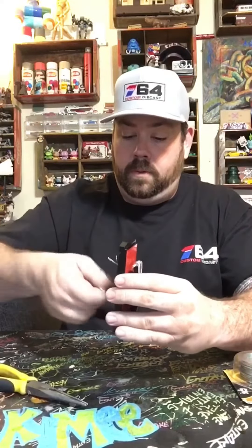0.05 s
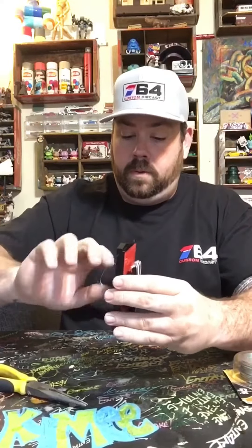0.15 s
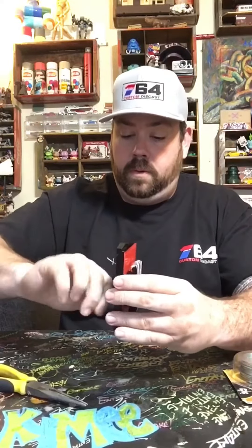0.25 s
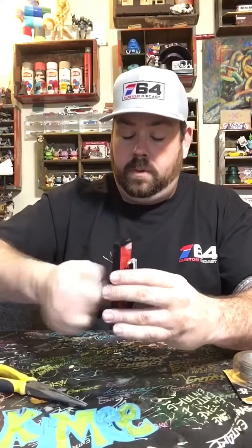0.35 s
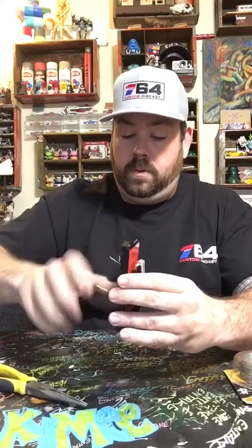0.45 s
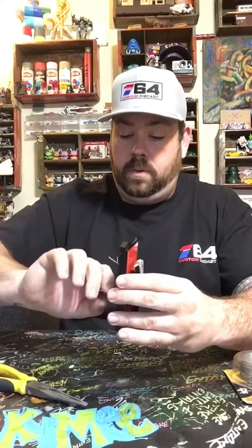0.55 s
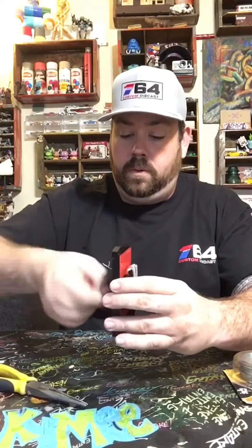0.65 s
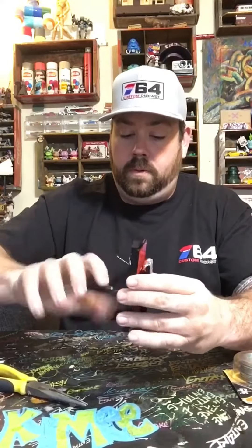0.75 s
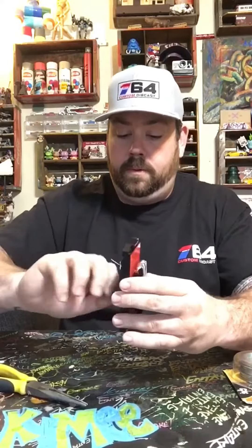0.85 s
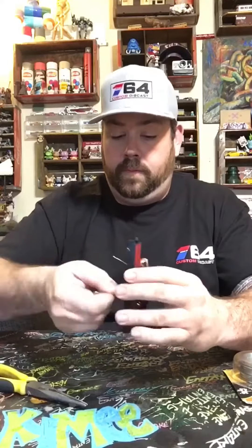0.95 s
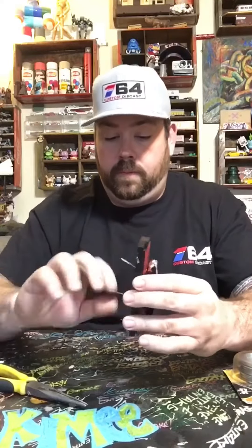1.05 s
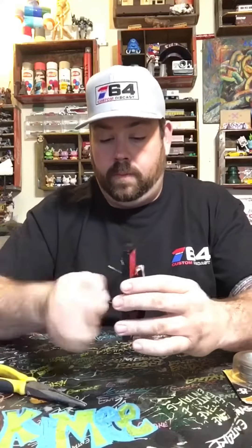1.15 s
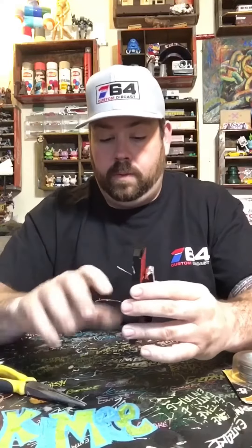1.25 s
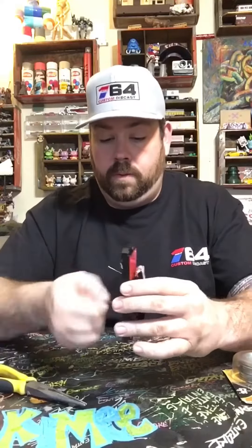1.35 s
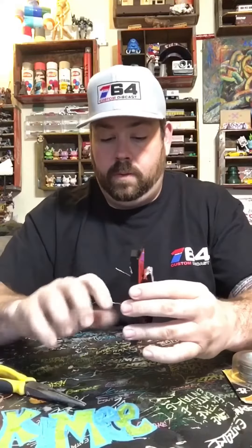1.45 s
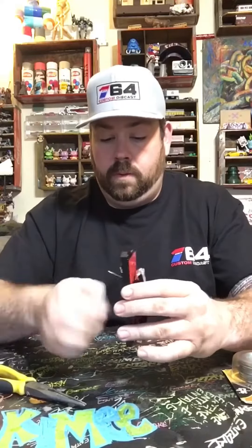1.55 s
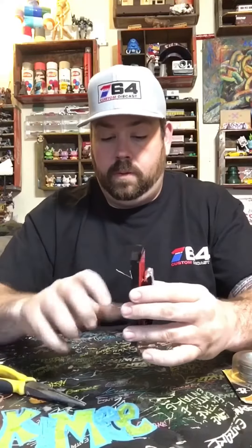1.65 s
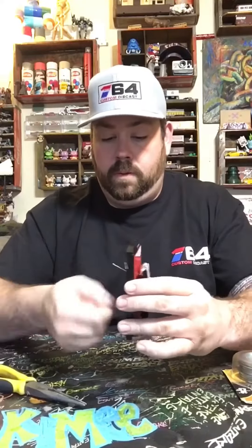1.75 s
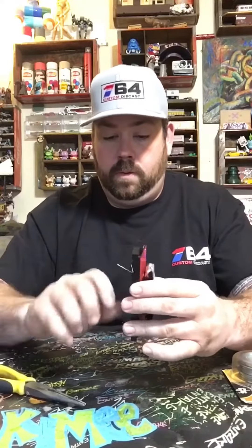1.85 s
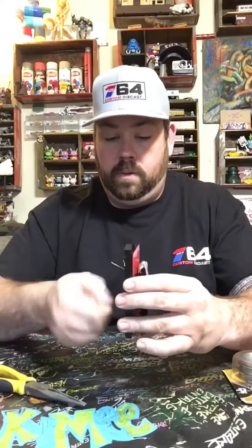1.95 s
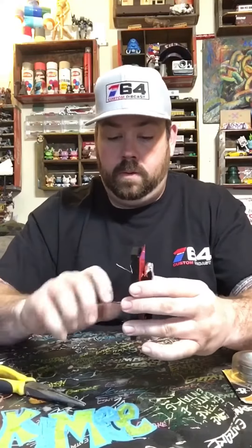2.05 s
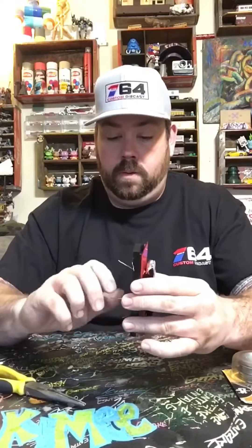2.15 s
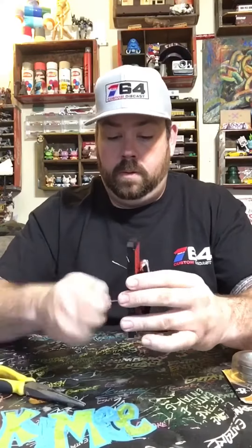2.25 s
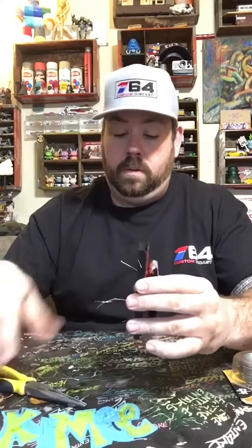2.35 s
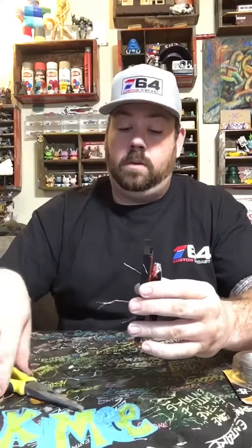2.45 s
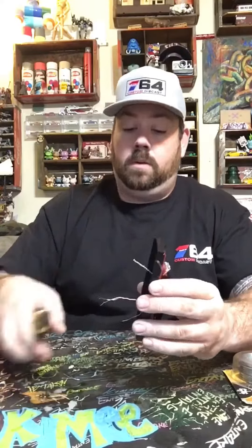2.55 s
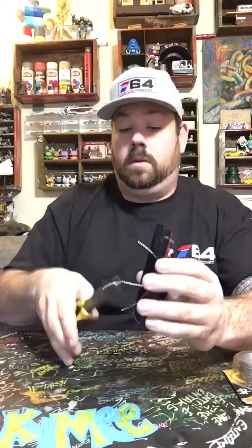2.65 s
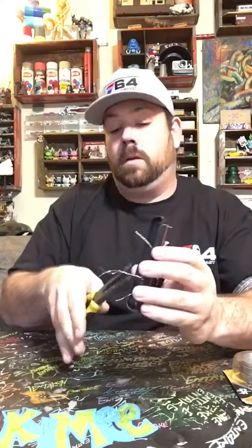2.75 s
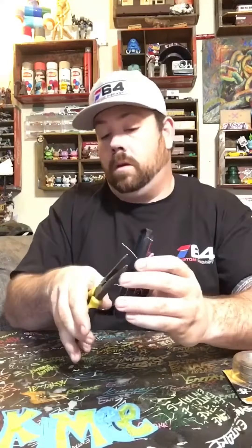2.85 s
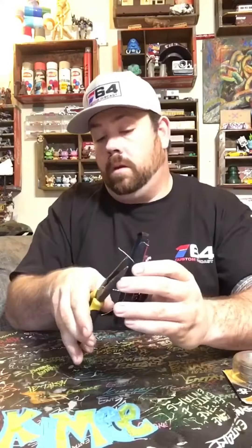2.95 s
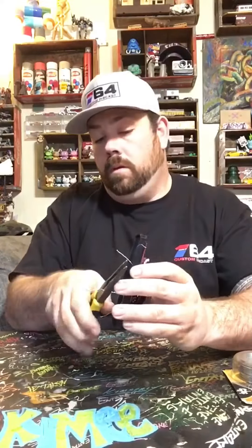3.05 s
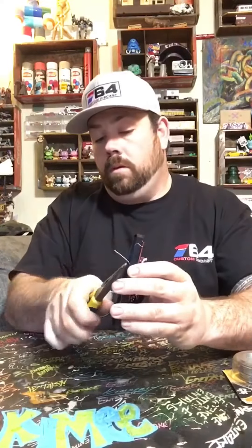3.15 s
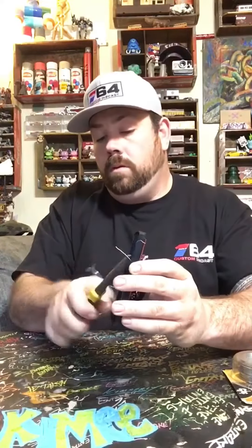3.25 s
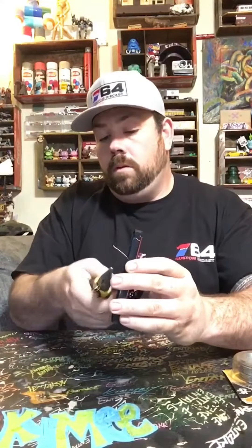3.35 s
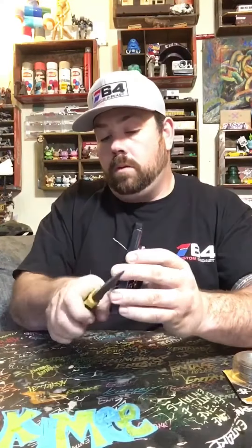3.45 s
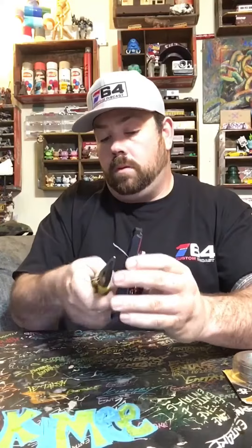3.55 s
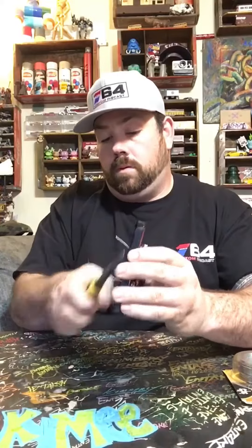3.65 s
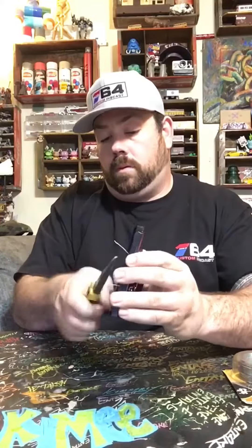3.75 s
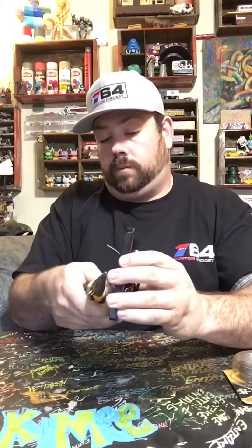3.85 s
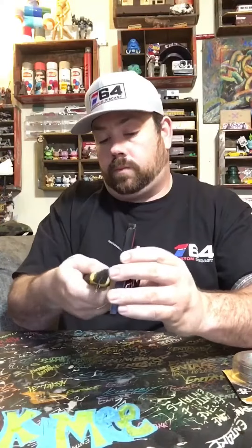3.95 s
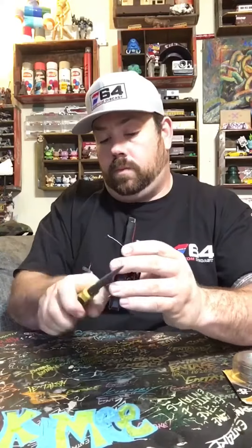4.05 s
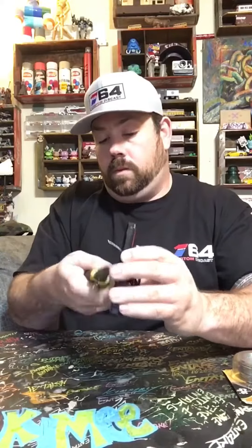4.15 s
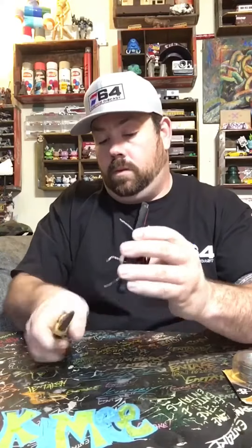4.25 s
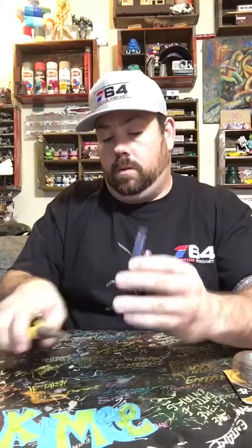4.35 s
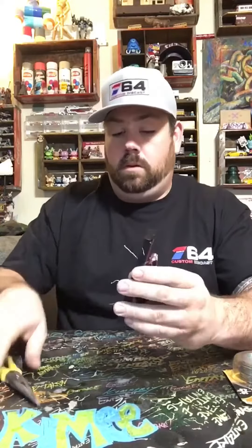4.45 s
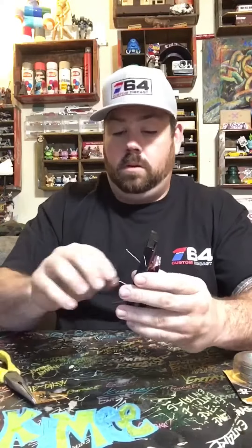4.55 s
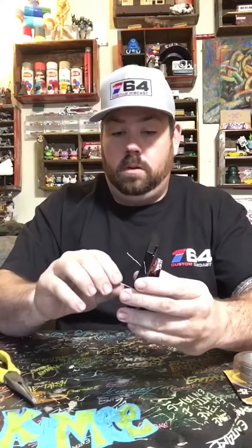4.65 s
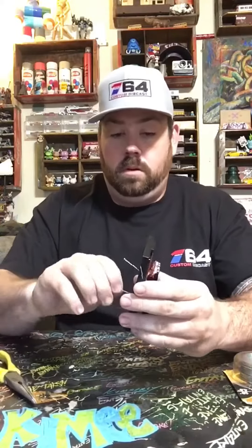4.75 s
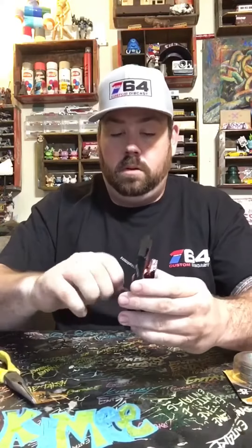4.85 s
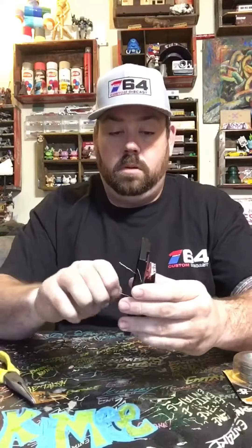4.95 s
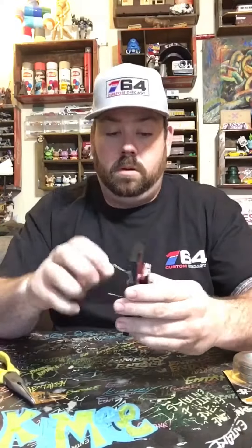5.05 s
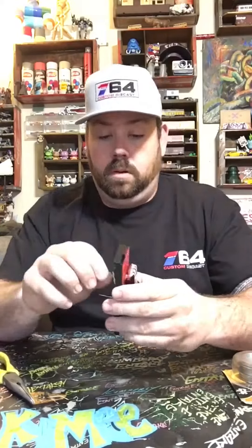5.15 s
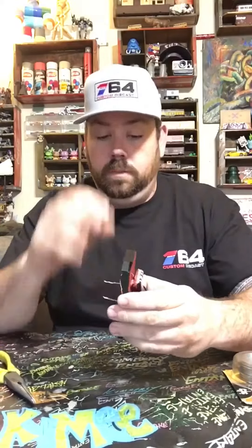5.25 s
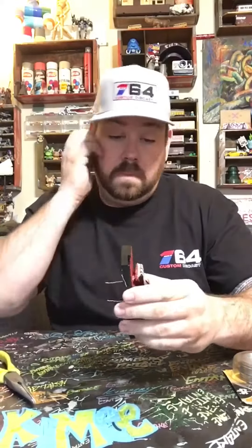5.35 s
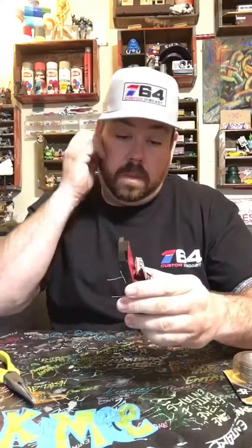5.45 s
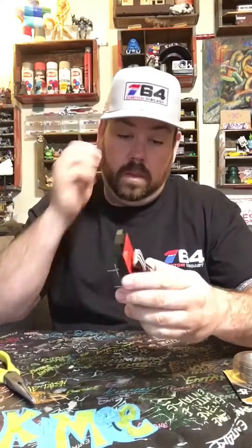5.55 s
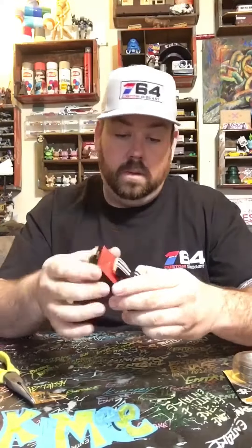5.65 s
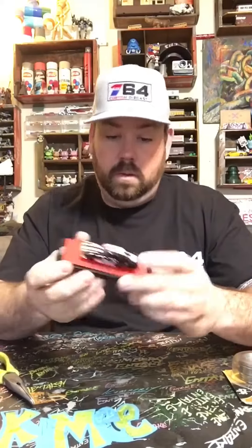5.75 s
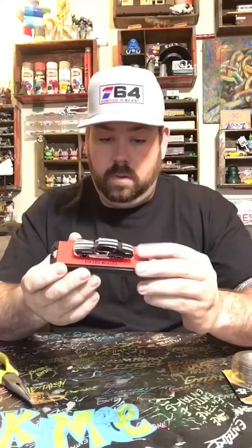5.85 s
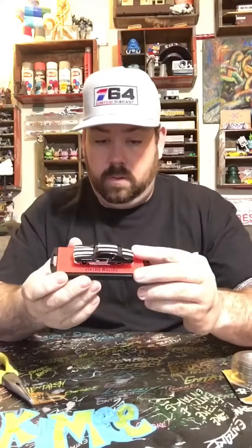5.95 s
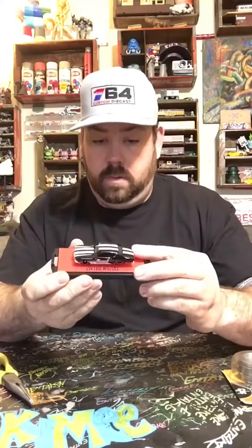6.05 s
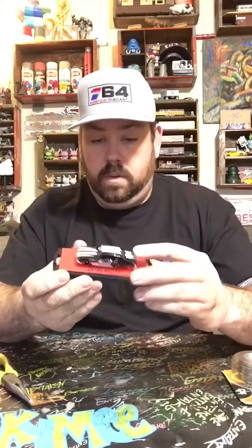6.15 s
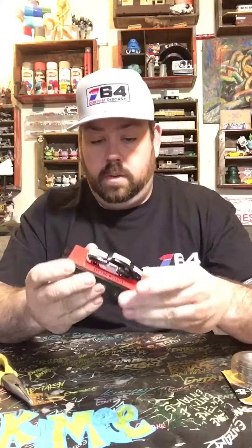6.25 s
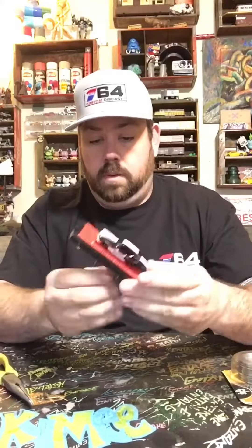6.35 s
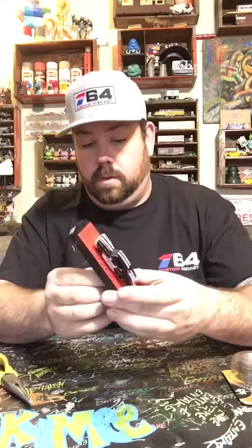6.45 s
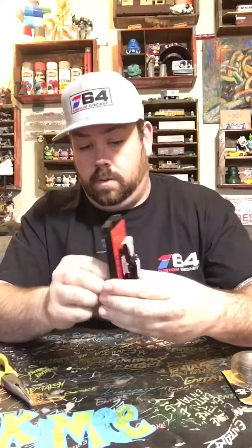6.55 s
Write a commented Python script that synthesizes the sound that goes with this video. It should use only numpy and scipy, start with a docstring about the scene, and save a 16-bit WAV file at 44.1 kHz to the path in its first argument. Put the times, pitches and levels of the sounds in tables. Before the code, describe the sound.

Sparse tiny metallic ticks and grainy finger strokes come first, broken by a crisp wire snap. A tool is lifted from a wooden table with a short knock and scrape, and light clicks and tiny squeaks follow in clusters. The tool then lands hard, rattling in rapid bounces, the loudest event. Handling ticks return quietly. Close microphone, small room with short tail, low appliance hum and soft hiss.

```python
"""Close by, thin steel wire ticks and snaps as fingers and pliers twist it on a small plastic base.
Fingers rub over it in grainy strokes, metal squeaks, and pliers bounce and drag on a wooden table.
Ticks, taps and friction are noise through resonances; the blows ring the decaying modes of table and pliers.
A short room tail follows. Behind lie faint hoots, an appliance's beating hum and whines, and steady air noise."""
import sys
import numpy as np
from scipy import signal
from scipy.fft import rfft, irfft, next_fast_len
from scipy.io import wavfile

SR = 44100
rng = np.random.default_rng(int(sys.argv[2]) if len(sys.argv) > 2 else 0)


def materialize(psi):
    """Save the field psi as 16-bit PCM at rate SR to the path in sys.argv[1].

    A 1-D psi becomes a single channel; in a 2-D psi each row is a channel.
    """
    bounded = np.clip(np.atleast_2d(psi).T, -1, 1)
    quanta = np.round(bounded * 32767).astype(np.int16)
    wavfile.write(sys.argv[1], SR, quanta)


N = 290486

# bounces of the pliers on the table: (time [s], level [dB], hardness of the contact [0-1],
# boom of the lowest modes [dB], clank of the jaws [dB])
BOUNCES = [(2.4683, -26, 0.63, -1.5, -15.5), (2.4715, -27.5, 0.07, -8, -9), (2.484, -34, 0, -0.5, -10),
           (2.502, -46, 0, -9, -11), (2.628, -41, 0, -8, -6), (2.638, -38.5, 0, -2, -12),
           (2.645, -50, 0, -10, -6), (2.658, -50, 0, -11, -11), (4.3933, -15.5, 0.7, 0, -3.5),
           (4.4107, -14.5, 0.64, -5, -0.5), (4.4115, -16, 0.6, 3, 3), (4.43, -21, 0.47, -2, 1),
           (4.4385, -29, 0.45, -6, -7.5), (4.4564, -25.5, 0.63, 3.5, -5), (4.473, -29, 0.46, 6, 3),
           (4.482, -35.5, 0.25, 3, -3), (4.4971, -32.5, 0.43, 3.5, 3.5), (4.509, -37, 0.04, 4, 3),
           (4.5227, -38.5, 0.25, 5, 6), (4.538, -47, 0.1, 2, 2)]
FAINT_COUNT = 10   # faint ticks, and as many faint rubs


def from_db(db):
    """Amplitude factor of a level in dB."""
    return 10 ** (np.asarray(db) / 20)


def rms_one(x):
    """Scales a signal to rms 1."""
    return x / np.sqrt(np.mean(x ** 2) + 1e-20)


def add(track, s, piece):
    """Mixes a piece in at a time in seconds."""
    at = max(round(s * SR), 0)
    track[at:at + len(piece)] += piece[:N - at]


def resonance(x, hz, width_hz):
    """Two-pole band-pass, gain about 1 on top."""
    r = np.exp(-np.pi * width_hz / SR)
    poles = [1, -2 * r * np.cos(2 * np.pi * hz / SR), r * r]
    return signal.lfilter([(1 - r * r) / 2, 0, (r * r - 1) / 2], poles, x)


def twice(x, hz, width_hz):
    """Two resonances in a row, the second twice as wide, scaled to rms 1."""
    return rms_one(resonance(resonance(x, hz, width_hz), hz, 2 * width_hz))


def filtered(x, order, hz, kind="low"):
    """Butterworth low-pass or high-pass."""
    return signal.sosfilt(signal.butter(order, hz, kind, fs=SR, output="sos"), x)


def dying(t60, size):
    """Envelope that loses 60 dB in t60 seconds, 4 ms at the shortest."""
    return from_db(-60 * np.arange(size) / SR / max(t60, .004))


def swelling(rise_s, size):
    """Envelope that rises exponentially towards 1."""
    return 1 - np.exp(-np.arange(size) / SR / rise_s)


def wander(per_s):
    """Random drift: straight lines between normal draws, two draws per cycle."""
    knots = rng.standard_normal(200)
    return np.interp(np.arange(N) / SR * per_s * 2, np.arange(200), knots)


def at_random(row):
    """Copies of a row at random times."""
    return [(s, *row) for s in rng.uniform(0, N / SR, FAINT_COUNT)]


def glide(from_hz, to_hz, size):
    """Phase of a tone whose pitch moves in a straight line."""
    return 2 * np.pi * np.cumsum(np.linspace(from_hz, to_hz, size)) / SR


def friction_grains(size, grain_db):
    """Noise with occasional far stronger samples, like surfaces catching on each other."""
    return rng.standard_normal(size) * from_db(grain_db * np.minimum(rng.exponential(1, size), 5))


def wire():
    """Each tick is a double snap and a dying burst through ring, frame, free ends, glint and the base's knock."""
    # wire ticks: (time [s], level [dB], ring [Hz], glint above the ring [dB], knock of the base [dB])
    tick_table = [(.18, -60.5, 6300, 0, -18), (.346, -63, 6540, 3.5, -20), (.4738, -66, 5530, -1, -13),
                  (.514, -53, 4500, -6, -24), (.5615, -38, 4880, -3.5, -36), (.7392, -64, 5530, 18, -24),
                  (.9843, -55, 6600, 2, -13), (1.3344, -25.5, 5900, -12, -0.5), (1.917, -66, 5000, 5, -13),
                  (2.1169, -52.5, 6060, -16, -21), (2.3105, -47, 7300, -6, -7.5),
                  (2.376, -62, 3337, 12, -14), (2.6085, -51, 2380, -16, 2), (2.6621, -53, 6440, -9, -6),
                  (2.6818, -52.5, 4570, -9, -18), (2.7809, -53.5, 4730, -23, -30),
                  (2.834, -54, 6220, -3, -21), (2.8465, -48, 3380, -2, 0.5), (2.911, -43, 5300, 3, -27),
                  (2.9694, -64, 2120, -32, 13), (3.098, -52, 1940, -18, -14), (3.088, -60, 6000, -6, -20),
                  (3.132, -43, 6600, -17, -30), (3.145, -69, 4000, -7, -2), (3.5344, -51, 5500, 1.5, -2),
                  (3.6167, -61.5, 7400, -5, 7.5), (3.652, -60, 5500, 5, -15), (3.787, -59, 6900, -17, -20),
                  (3.6846, -51, 6300, -5, -19), (3.699, -49.5, 3530, -25, -4),
                  (3.8232, -56, 7100, -24, -13), (3.8563, -44.5, 6700, 1.5, -38),
                  (3.8755, -56, 5430, -1, -21), (3.889, -43.5, 6740, 3, -30),
                  (3.9746, -58.5, 5630, 6.5, -26), (4.01, -55, 5500, 1, -25), (4.0227, -47, 3650, -6, -29),
                  (4.032, -38.5, 5660, -4, -15), (4.0395, -34.5, 5040, 0, -26), (4.082, -73, 6000, 0, -25),
                  (4.208, -28, 5340, 1.2, -35), (4.9746, -58.5, 3300, -3, -17),
                  (5.019, -52.5, 7080, 6, -30.5), (5.2592, -47, 4060, -27, 2.5),
                  (5.3986, -59, 4680, -19, -14), (5.5368, -43, 4100, -5, -20.5),
                  (5.5415, -47.5, 6000, -7, -17), (5.606, -40, 3030, -12, -25),
                  (5.6075, -42.5, 7100, -5, -25), (5.611, -43.5, 3940, -9, -18), (5.648, -70, 7100, 8, -25),
                  (5.652, -67, 7100, 10, -25), (5.674, -56, 2900, -11, -19), (5.7097, -46.5, 2590, -17, -4),
                  (5.7225, -55.5, 6430, 0.5, -16), (5.731, -55.5, 6020, -25, -12),
                  (5.8845, -54, 1995, -12, 0), (6.062, -60, 2890, -2, -27), (6.072, -65, 2880, 9, -29),
                  (6.0915, -52.5, 3260, -14, -4), (6.1355, -60.5, 3480, 10.5, -22),
                  (6.1848, -51.5, 3330, -11, -4), (6.264, -61, 5100, 2.5, -3),
                  (6.269, -65, 4940, 17.5, -11), (6.4292, -51.5, 6350, -3, -9.5),
                  (6.4592, -59, 3900, -22, 16), (6.535, -32.5, 3630, -29, -4), (6.58, -52.5, 7800, 3.5, -2)]
    # clicks around the landing of the pliers, a faint one just before it, then their loose joint
    # between the bounces: (time [s], level [dB])
    pliers_clicks = [(4.3845, -43), (4.4385, -35), (4.484, -44), (4.488, -33), (4.493, -51), (4.5022, -52),
                     (4.5125, -52), (4.518, -40), (4.527, -51), (4.533, -50), (4.543, -56), (4.5478, -50)]
    # plastic base: (centre [Hz], width [Hz], level [dB])
    base_rings = [(468, 276, -6.5), (886, 265, 1.5), (1210, 10, -6.5), (2190, 570, 0.5), (3030, 160, -7)]
    # wire frame: (centre [Hz], width [Hz], level [dB])
    frame_rings = [(3240, 160, -13), (3980, 89, -8), (4966, 740, -11.5), (6050, 275, -8.5),
                   (7170, 190, -9.5)]
    # peaks in the glint: (centre [Hz], width [Hz], level [dB])
    glint_peaks = [(10200, 2700, -1.5), (12350, 2700, -2), (14200, 1200, -5.5)]
    tick_db, size, click = -3, 5000, 5.14   # click: first sample of each burst
    snap_t60_s, tail_t60_s, tail_db, rise_s = .007, 0.043, -14, .0004
    second_slip_s, second_slip_db, slip_spread_db = .0045, -16, 3   # the wire snaps again just after
    ring_cycles, frame_db, spread_db = 6.8, -2.5, 3.5
    glint_hz, glint_width_hz, glint_peaks_db = 11100, 6200, -4
    free_low_hz, free_high_hz, free_cycles, free_db = 3990, 14300, 200, -16
    click_hz, click_glint_db = 5600, 9   # ring and glint of the pliers' clicks

    def varied(burst, rings):
        """Rings of a burst, each at a level of its own."""
        luck_db = spread_db * rng.standard_normal(len(rings))
        return sum(from_db(g + u) * twice(burst, f, w) for (f, w, g), u in zip(rings, luck_db))

    ticks = list(tick_table)
    ticks += [(s, db - click_glint_db, click_hz, click_glint_db, -60) for s, db in pliers_clicks]
    ticks += at_random((-66, 5000, 3, -12))   # fainter ticks: (level, ring, glint, knock)
    out = np.zeros(N)
    rise = swelling(rise_s, size)
    first_slip = dying(snap_t60_s, size)
    tail = from_db(tail_db) * dying(tail_t60_s, size)
    for s, db, hz, glint_db, base_db in ticks:
        bursts = rng.standard_normal((3, size))
        bursts[:, 0] = click
        a, b, c = bursts
        slip_db = second_slip_db + slip_spread_db * rng.standard_normal()
        snap = first_slip + from_db(slip_db) * np.roll(first_slip, round(second_slip_s * SR))
        # free ends ring at pitches of their own each time
        free_hz = free_low_hz * (free_high_hz / free_low_hz) ** rng.random(4)
        free = sum(rms_one(resonance(b, f, f / free_cycles)) for f in free_hz)
        glint = twice(c, glint_hz, glint_width_hz) + from_db(glint_peaks_db) * varied(b, glint_peaks)
        glint = rms_one(glint) + from_db(free_db) * free
        ring = twice(a, hz, hz / ring_cycles)
        bright = ring + from_db(frame_db) * varied(c, frame_rings) + from_db(glint_db) * glint
        base = sum(from_db(base_db + g) * twice(a, f, w) for f, w, g in base_rings)
        add(out, s, from_db(db + tick_db) * rise * ((snap + tail) * bright + tail * base))
    return out


def squeaks_and_ringing():
    """Squeaks of sliding metal and a loud tick's ringing tail: short gliding tones roughened by slow noise."""
    # squeaks of metal on metal; the two near 1.35 s are the ringing tail of the loud tick at 1.334 s:
    # (middle [s], length at half height [s], start [Hz], end [Hz], level [dB])
    short_tones = [(.572, 0.011, 5100, 4950, -62), (1.35, 0.014, 3040, 2720, -61),
                   (1.358, .012, 6000, 6250, -67), (1.404, 0.0052, 4960, 4880, -70),
                   (2.445, .007, 4830, 4720, -64), (2.454, 0.0088, 3120, 3100, -68),
                   (2.799, 0.019, 4650, 4240, -70.5), (2.8, 0.017, 6320, 6500, -70),
                   (2.803, .022, 3700, 3600, -73), (2.858, 0.015, 3460, 3880, -73),
                   (2.951, .035, 12100, 12300, -73), (2.954, 0.032, 5230, 5600, -72),
                   (2.925, 0.011, 12600, 12300, -64), (3.108, 0.022, 2230, 3830, -62),
                   (3.109, 0.007, 6200, 6200, -58.5), (3.624, .012, 7000, 7500, -76),
                   (3.83, .02, 7300, 7100, -80), (3.865, .01, 5940, 5900, -60.5),
                   (3.903, 0.016, 6000, 5970, -65), (4.047, .006, 10200, 10200, -53),
                   (4.126, .014, 10300, 9900, -78), (5.544, .012, 6100, 6060, -68),
                   (5.55, 0.015, 3850, 3840, -69), (5.545, 0.013, 2800, 2750, -70),
                   (5.619, 0.019, 3930, 3230, -71.5), (6.525, 0.013, 2510, 2490, -68),
                   (6.539, 0.0071, 2560, 2460, -51), (6.557, 0.011, 3710, 3600, -64)]
    tone_cycles = 14   # the more, the slower the roughness and the purer the tone
    out = np.zeros(N)
    for middle, length, from_hz, to_hz, db in short_tones:
        size = round(2 * length * SR)
        turn = glide(from_hz, to_hz, size)
        slow = filtered(rng.standard_normal((2, 5000)), 2, to_hz / tone_cycles / 2)
        a, b = rms_one(slow)[:, -size:]
        add(out, middle - length, from_db(db) * np.hanning(size) * (a * np.sin(turn) + b * np.cos(turn)))
    return out


def rubbing_and_short_tick():
    """Fingers over the wire, and one short tick: clumped grains under smooth strokes, the wire singing along."""
    # rubs, with a quick even run of strokes as the wire is twisted; the very short one at 2.403 s is a tick:
    # (middle [s], length at half height [s], level [dB])
    stroke_table = [(.054, 0.018, -73.5), (.755, 0.019, -62), (.993, 0.024, -69.5), (1.157, 0.032, -60.5),
                    (1.22, 0.018, -69), (1.28, 0.028, -73), (1.352, 0.032, -62), (1.41, 0.03, -67),
                    (1.476, 0.0093, -66.5), (1.555, 0.037, -65.5), (1.622, 0.028, -67), (1.693, 0.042, -74),
                    (1.746, 0.02, -64.5), (1.807, 0.039, -70.5), (1.872, 0.026, -67.5),
                    (1.95, 0.036, -71.5), (2.003, 0.033, -71.5), (2.065, 0.035, -69.5), (2.257, 0.013, -74),
                    (2.338, 0.074, -67.5), (2.403, 0.0035, -54), (2.801, 0.027, -70), (2.948, 0.049, -74),
                    (3.277, 0.039, -70), (3.69, 0.0078, -59.5), (3.722, 0.085, -74), (4.123, 0.018, -70),
                    (4.185, 0.036, -72.5), (4.739, 0.022, -62), (5.258, 0.033, -71), (6.52, 0.019, -75)]
    # rub resonances, each with grains of its own: (centre [Hz], width [Hz], level [dB])
    skin_rings = [(5596, 4080, 3), (12320, 5800, -1)]
    grain_db, clump_hz, clump_db = 2.5, 150, 2
    scrape_hz, scrape_width_hz, scrape_share = 1930, 250, 0.23
    sing_hz, sing_spread, sing_cycles, sing_db = 5130, 0.1, 8, -10   # spread is relative
    grains = friction_grains(N + SR, grain_db)
    clumps = rms_one(filtered(rng.standard_normal(N + SR), 2, clump_hz))
    grains = grains * from_db(clump_db * clumps)
    # a shift by whole seconds gives each resonance other grains
    skin = rms_one(sum(from_db(db) * twice(np.roll(grains, k * SR), hz, w)
                       for k, (hz, w, db) in enumerate(skin_rings)))
    dull = rms_one(resonance(grains, scrape_hz, scrape_width_hz))
    out = np.zeros(N)
    strokes = list(stroke_table) + at_random((.04, -78))   # fainter rubs: (length, level)
    for middle, length, db in strokes:
        hz = sing_hz * np.exp(sing_spread * rng.standard_normal())
        stroke = from_db(db) * np.hanning(round(2 * length * SR))
        start = round(middle * SR)
        now = slice(start, start + len(stroke))
        sing = from_db(sing_db) * twice(grains[now], hz, hz / sing_cycles)
        add(out, middle - len(stroke) / SR / 2, stroke * (skin[now] + scrape_share * dull[now] + sing))
    return out


def taps():
    """Soft fingertips on the base: dull dying bursts that start with a click."""
    # taps: (time [s], level [dB], ring [Hz], first impulse against the noise [ratio], t60 [s])
    touches = [(.071, -68, 690, 6, .06), (0.297, -63.5, 1100, 2.5, 0.09), (0.6385, -60, 1270, 14, 0.036),
               (5.53, -65.5, 990, 20, 0.024)]
    tap_cycles = 2.1
    out = np.zeros(N)
    for s, db, hz, impulse, t60 in touches:
        noise = rng.standard_normal(5000)
        noise[0] = impulse
        add(out, s, from_db(db) * dying(t60, size=5000) * twice(noise, hz, hz / tap_cycles))
    return out


def pliers():
    """Each bounce is a blow and a chatter driving all modes; a softer contact leaves the high ones weaker."""
    # modes of table top and pliers: (pitch [Hz], level [dB], t60 [s])
    hz, mode_db, t60 = np.transpose([(298.4, -10, 0.06), (348, -13.5, 0.073), (398, -4, 0.072),
                                     (446, 0, 0.085), (498, -4.5, 0.04035), (624, -5.5, 0.045),
                                     (781.5, -8.5, 0.075), (882, -13.5, 0.074), (958, -4.5, 0.027),
                                     (1058, -2.5, 0.056), (1190, -8.5, 0.02), (1313, -13.5, 0.035),
                                     (1470, -4, 0.021), (1560, 2, 0.023), (2356, -9, 0.021),
                                     (3066, 1, 0.014), (3410, -1, 0.018), (3763, -2, 0.013),
                                     (4380, -2.5, 0.0071), (4786, -5, 0.0099), (6665, -8.5, 0.007),
                                     (8080, -9.5, 0.026)])
    all_modes_db, mode_spread_db, detune = -10.5, 4.5, .015   # modes shift a little with the spot struck
    boom_under_hz, clank_low_hz, clank_high_hz = 560, 1450, 1750
    chatter_db, chatter_t60_s = -23.5, 0.021
    crack_db, crack_t60_s, crack_rise_s = -0.5, 0.013, .0004
    rattle_db, rattle_hz, rattle_width_hz, rattle_t60_s = -11, 820, 950, 0.042   # loose things buzz along
    soft_hz, hard_range = 759, 32   # contact cut-off of the softest blow, its factor up to the hardest
    table_low_hz, size = 270, 4000   # the top radiates little lower
    t = np.arange(10000) / SR
    fades = np.array([dying(d, size=10000) for d in t60])
    signs = (-1) ** np.arange(len(hz))
    is_boom = hz < boom_under_hz
    is_clank = (hz > clank_low_hz) & (hz < clank_high_hz)
    crack_shape = from_db(crack_db) * dying(crack_t60_s, size) * swelling(crack_rise_s, size)
    out = np.zeros(N)
    for s, db, hardness, boom_db, clank_db in BOUNCES:
        struck_hz = hz * (1 + detune * rng.standard_normal(len(hz)))
        modes = np.sin(2 * np.pi * struck_hz[:, None] * t) * fades
        noise = rng.standard_normal(size)
        force = from_db(chatter_db) * noise * dying(chatter_t60_s, size)
        force[0] = 1   # the blow itself
        luck_db = mode_spread_db * rng.standard_normal(len(hz))
        struck_db = boom_db * is_boom + clank_db * is_clank
        gains = signs * from_db(all_modes_db + mode_db + luck_db + struck_db)
        blow = signal.fftconvolve(gains @ modes, force)
        add(blow, 0, crack_shape * noise)
        rattle = twice(noise[::-1], rattle_hz, rattle_width_hz) * dying(rattle_t60_s, size)
        add(blow, 0, from_db(rattle_db) * rattle)
        contact_hz = soft_hz * hard_range ** np.clip(hardness, 0, 1)
        add(out, s, from_db(db) * filtered(blow, 2, contact_hz))
    return filtered(out + 1e-18, 2, table_low_hz, "high")


def dragging():
    """Pliers dragged over the table top: grainy friction sets the jaws ringing over a hiss."""
    # drags: (middle [s], length at half height [s], level [dB], hiss of the top against the jaws [dB])
    drags = [(2.428, 0.007, -34, -11), (2.434, 0.0095, -44, -10), (2.443, 0.015, -53, -15),
             (2.525, 0.049, -57.5, -4), (2.635, 0.023, -61, -6.5), (4.436, 0.02, -46.5, -2.5),
             (4.485, 0.03, -59, -11), (4.53, 0.05, -65.5, -4), (4.602, 0.077, -69.5, -8)]
    # jaw rings: (centre [Hz], width [Hz], level [dB])
    jaw_rings = [(1644, 1100, -8.5), (3300, 300, -7.5), (4660, 650, -2.5), (6300, 2000, -6),
                 (7460, 1500, -2.5), (9070, 870, -3.5)]
    grain_db, hiss_hz, hiss_width_hz = 5.5, 11400, 18000
    flicker_db, flicker_per_s = 4, 15   # each jaw ring swells and fades by itself
    grains = friction_grains(N, grain_db)
    jaws = np.zeros(N)
    for k, (hz, width_hz, db) in enumerate(jaw_rings):
        level = from_db(db + flicker_db * wander(flicker_per_s))
        jaws += (-1) ** k * level * rms_one(resonance(grains, hz, width_hz))
    strokes, hissing = np.zeros(N), np.zeros(N)
    for middle, length, db, hiss_db in drags:
        stroke = from_db(db) * np.hanning(round(2 * length * SR))
        add(strokes, middle - length, stroke)
        add(hissing, middle - length, from_db(hiss_db) * stroke)
    return strokes * rms_one(jaws) + hissing * twice(grains, hiss_hz, hiss_width_hz)


def thuds():
    """A blow shakes the microphone through the table: deep dying noise under each bounce."""
    thud_db, thud_hz, thud_t60_s = -38, 60, .25
    out = np.zeros(N)
    for s, db, *_ in BOUNCES:
        shake = rms_one(filtered(rng.standard_normal(10000), 2, thud_hz))
        add(out, s, from_db(db + thud_db) * dying(thud_t60_s, size=10000) * shake)
    return out


def room(x):
    """Diffuse tail: dying noise, slightly dulled, swelling in over the first reflections."""
    t60_s, swell_s, cut_hz, size = 0.15, 0.003, 15000, SR // 2
    tail = rng.standard_normal(size) * dying(t60_s, size) * swelling(swell_s, size)
    tail = filtered(tail, 1, cut_hz)
    return signal.fftconvolve(x, tail / np.sqrt(np.sum(tail ** 2)))[:N]


def hoots():
    """Brief faint gliding tones with a weak octave."""
    # hoots: (start [s], length [s], start pitch [Hz], end pitch [Hz], level [dB])
    calls = [(5.81, .085, 810, 735, -63), (2.9, .14, 815, 790, -66)]
    octave_db = -14
    out = np.zeros(N)
    for s, length, from_hz, to_hz, db in calls:
        turn = glide(from_hz, to_hz, round(length * SR))
        tone = np.sin(turn) + from_db(octave_db) * np.sin(2 * turn)
        add(out, s, from_db(db) * np.hanning(len(turn)) * tone)
    return out


def appliance():
    """A low hum, like a narrow noise band that beats at random, noisy resonances and two thin steady whines."""
    # chance beating of the narrow hum, drawn as a curve: (time [s], level [dB])
    s, beating_db = np.transpose([(0.0, -57.5), (0.6, -81), (0.73, -46.5), (1.04, -81), (1.08, -54.5),
                                  (2.33, -65.5), (2.77, -54.5), (3.12, -77), (3.15, -56), (3.93, -63),
                                  (5.39, -52.5), (5.45, -69.5), (6.38, -52.5), (6.59, -75.5)])
    # noisy resonances: (centre [Hz], width [Hz], rms level [dB])
    skirt_rings = [(178.7, 28.1, -59.5), (1222, 60, -84), (678, 93, -81), (363, 33, -80.5)]
    # steady tones: (pitch [Hz], rms level [dB])
    whines = [(1461, -83), (1669, -89.5)]
    hum_hz, stray_hz, stray_per_s = 179.5, 2.36, 4   # the pitch strays at random
    t = np.arange(N) / SR
    turn = 2 * np.pi * np.cumsum(hum_hz + stray_hz * wander(stray_per_s)) / SR
    hum = from_db(np.interp(t, s, beating_db)) * np.sin(turn)
    noise = rng.standard_normal(N)
    skirt = sum(from_db(db) * twice(noise, f, w) for f, w, db in skirt_rings)
    whine = sum(from_db(db) * np.sqrt(2) * np.sin(2 * np.pi * f * t) for f, db in whines)
    return hum + skirt + whine


def air():
    """Steady noise of room and microphone, shaped in the spectrum."""
    # relative spectrum: (frequency [Hz], level per Hz [dB])
    f, db = np.transpose([(25, -12.5), (60, -16), (103, -16), (150, -16), (230, -15), (321, -18.5),
                          (687, -22.5), (927, -28), (1400, -28), (2330, -32), (5420, -35.5), (8600, -36),
                          (12900, -42.5), (16000, -50)])
    air_db = -70.5
    size = next_fast_len(N)
    hz = np.maximum(np.arange(size // 2 + 1) * SR / size, 1)
    gains = from_db(np.interp(np.log(hz), np.log(f), db))
    shaped = irfft(rfft(rng.standard_normal(size)) * gains, size)
    return from_db(air_db) * rms_one(shaped[:N])


def scene():
    """Handling sounds with their room tail, over thuds, hoots, appliance and air."""
    room_db = -14.5
    hands = wire() + squeaks_and_ringing() + rubbing_and_short_tick() + taps() + pliers() + dragging()
    return (hands + from_db(room_db) * room(hands) + thuds() + hoots() + appliance() + air())[None]


def record(dry):
    """A small microphone: no deep bass, a dip in the treble, the top cut."""
    bass_cut_hz, dip_hz, dip_width_hz, dip_depth, top_hz = 135.2, 8600, 1400, 0.6, 16900
    x = filtered(dry, 2, bass_cut_hz, "high")
    x = x - dip_depth * resonance(x, dip_hz, dip_width_hz)
    # 50 dB down from top_hz upwards
    return signal.sosfilt(signal.cheby2(10, 50, top_hz, fs=SR, output="sos"), x)


dry = scene()
out = record(dry)
materialize(out)
```